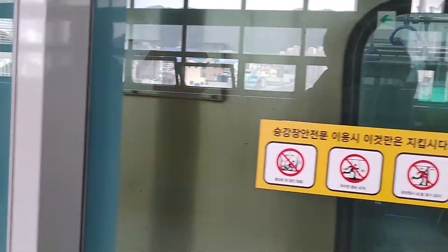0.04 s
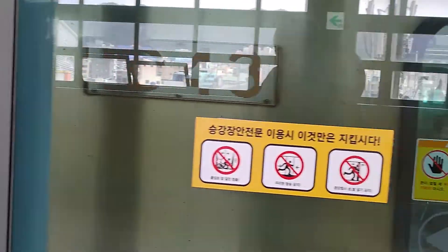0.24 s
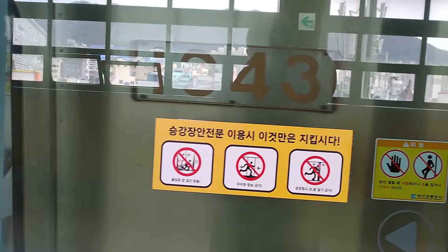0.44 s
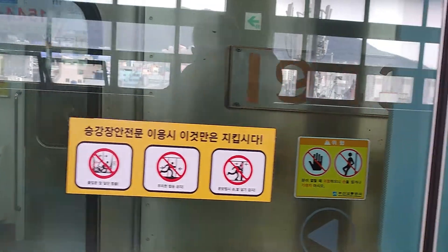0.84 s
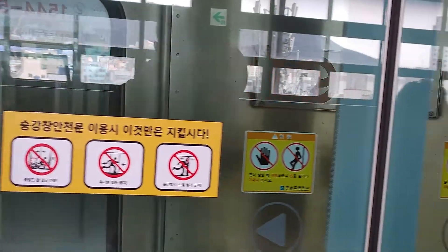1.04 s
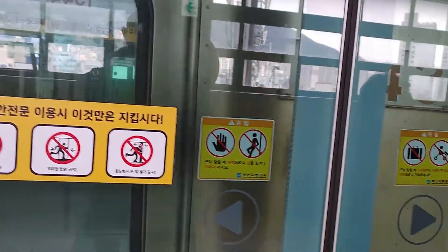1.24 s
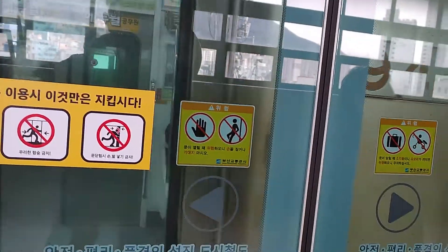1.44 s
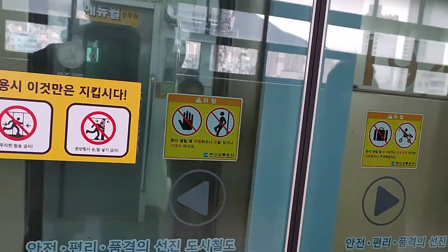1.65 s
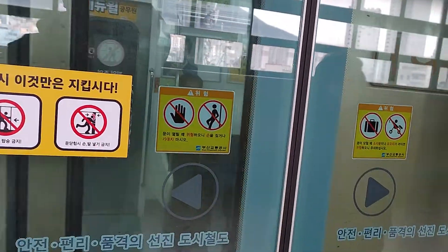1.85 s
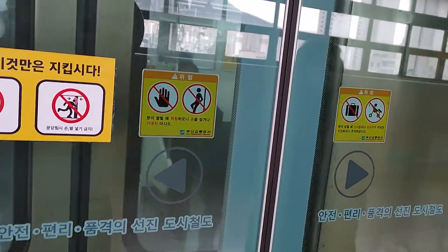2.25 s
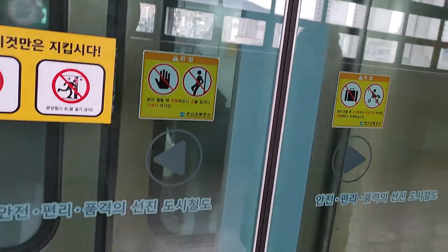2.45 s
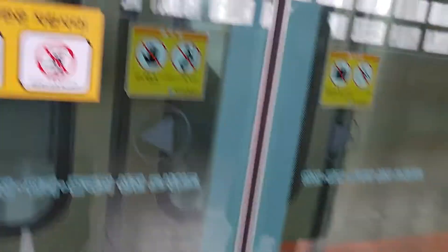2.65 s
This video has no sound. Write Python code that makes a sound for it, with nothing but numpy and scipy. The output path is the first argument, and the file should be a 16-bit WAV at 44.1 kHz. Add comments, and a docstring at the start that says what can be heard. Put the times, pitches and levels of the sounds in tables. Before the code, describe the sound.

A metro train's brakes squeal loudly over a faint rumble as it slows to a stop.

```python
"""A brake squeals near 4.9 kHz as a metro train stops behind the platform screen doors.
Heard from the platform, it swells and fades at each microphone as the car slides by. A weaker brake
joins near 3.5 kHz; others whistle faintly. Below, wheels rumble, pads rasp and the car body hums.
Air puffs and the running gear knocks near the stop. The loudest swell clips."""
import sys
import numpy as np
from scipy import signal
from scipy.fft import rfft, irfft
from scipy.io import wavfile
from scipy.ndimage import uniform_filter1d

SR = 44100
rng = np.random.default_rng(int(sys.argv[2]) if len(sys.argv) > 2 else 0)


def waveform_to_disk(signal):
    """Save audio, clipped to [-1, 1], as 16-bit WAV at the path in sys.argv[1]."""
    frames = np.transpose(np.atleast_2d(signal))
    scaled = np.clip(frames, -1, 1) * 32767
    samples = np.round(scaled).astype(np.int16)
    wavfile.write(sys.argv[1], SR, samples)


N = 119070
TIME_S = np.arange(N) / SR

# Left-right correlation of the noises. Each row: frequency in Hz, correlation.
CORRELATION = [(30, .8), (100, 0.4), (250, 1), (500, 0.5), (1000, -.1), (2200, 0), (4500, -.1),
               (12000, 0.07)]
# Spectra of wheels, pads and brake air. Each row: frequency in Hz, relative density in dB.
RUMBLE_SPECTRUM = [(15, -44), (25, -23.5), (86, -24.5), (216, 2.5), (289, 6), (321, -5.5), (377, 0),
                   (448, -10), (554, -11.5), (600, -10.5), (780, -85.5), (1320, -120)]
ROAR_SPECTRUM = [(300, -8.5), (500, -1), (850, 1.5), (1400, -4), (1800, -14.5), (2300, -26), (4000, -76)]
RASP_SPECTRUM = [(700, -58.5), (1400, -12), (1850, -0.5), (2050, -5), (2350, 2), (3000, -3.5),
                 (3600, -10.5), (4600, -7.5), (5300, -4.5), (6400, -5), (7100, -18.5), (7700, -24.5),
                 (9000, -80.5)]
FIZZ_SPECTRUM = [(6000, -8.5), (7000, 11), (7700, -2.5), (9000, 2), (10500, -2), (11700, 4.5), (12300, -5),
                 (12800, -21), (15800, -26.5)]
AIR_SPECTRUM = [(500, 4.5), (1500, -0.5), (3000, 5), (6000, 7), (8000, 1.5), (11000, 3.5), (13000, -10),
                (15800, -23)]
# Wheel and pad envelopes. Each row: time in seconds, relative level in dB.
RUMBLE_DB = [(0.0, -44.5), (0.1, -48.5), (0.68, -56), (0.75, -37), (0.82, -39.5), (0.83, -41),
             (1.42, -50.5), (1.66, -54.5), (2.19, -51.5), (2.21, -45), (2.7, -47)]
ROAR_DB = [(0.0, -48.5), (0.33, -53.5), (0.36, -59), (0.71, -53), (0.77, -40), (0.86, -48), (1.38, -47),
           (1.53, -53.5), (1.95, -55), (2.09, -60.5), (2.19, -44), (2.57, -50), (2.58, -53.5), (2.7, -55)]
RASP_DB = [(0.0, -43), (0.45, -53), (0.78, -44.5), (0.99, -47), (1.25, -44.5), (1.53, -48.5), (1.57, -47.5),
           (1.61, -50.5), (2.26, -53.5), (2.5, -58), (2.7, -58)]
FIZZ_DB = [(0, -53), (.3, -59.5), (1.08, -56), (1.18, -53), (1.28, -57), (1.37, -47.5), (1.48, -56.5),
           (2.4, -52.5), (2.6, -59.5)]
# Car body notes. Each row: start and end in seconds, pitch in Hz, level in dB.
BODY_HUMS = [(0.701, 0.86, 119.2, -50.5), (0.86, 1.096, 118.4, -48), (1.124, 1.228, 109, -51.5)]
# Brake air. Each row: start and length in seconds, level in dB.
AIR_PUFFS = [(2.452, 0.15, -51), (2.616, 0.17, -51.5)]
# Running gear. Each row: start in seconds, level in dB, centre in Hz, T60 in seconds.
GEAR_KNOCKS = [(2.508, -36.5, 1740, 0.042), (2.535, -51, 60, 0.12)]
# Far brakes. Each row: start and end in seconds, start and end pitch in Hz, relative level in dB.
FAR_WHISTLES = [(-.1, 0.216, 5775, 5640, -43), (0.102, 0.256, 6905, 6860, -44),
                (0.2, 0.625, 6834, 6800, -46), (0.32, .75, 5636, 5555, -45.5), (.42, .65, 4295, 4300, -51),
                (.56, 0.824, 5944, 5960, -37), (0.796, 1.35, 5570, 5570, -47.5),
                (0.829, 1.078, 5870, 5945, -42), (1.261, 1.972, 5700, 5600, -45.5),
                (1.36, 1.56, 6840, 6840, -48.5), (1.521, 1.84, 6000, 6140, -50.5),
                (1.555, 2.029, 6790, 6880, -44), (1.978, 2.248, 6070, 6085, -54),
                (2.022, 2.19, 1884, 1866, -55.5), (2.025, 2.168, 4080, 4065, -48),
                (2.041, 2.308, 6860, 6830, -44), (2.26, 2.551, 6773, 6750, -44),
                (2.297, 2.584, 4670, 4620, -55), (2.436, 2.619, 6110, 6020, -48),
                (2.546, 2.8, 5920, 5910, -42.5)]
# Second and main squeal, fade to fade. Each row: start in seconds, relative fade and swell levels in dB.
SECOND_BRAKE_SWELLS = [(1.15, -89, -75), (1.3, -56.5, -39), (1.485, -46, -42.5), (1.62, -52, -44.5),
                       (1.72, -55.5, -52.5), (1.9, -59.5, -42.5), (1.995, -47, -36.5), (2.082, -46, -32),
                       (2.205, -44, -60), (2.275, -76, -45), (2.335, -74, -52), (2.4, -62, -49),
                       (2.48, -64, -75)]
MAIN_SWELLS_LEFT = [(0.0, -35.0, -26.0), (0.13, -33.0, -17.0), (0.254, -32.0, -7.0), (0.32, -24.0, -10.0),
                    (0.388, -15.0, -10.0), (0.521, -23.0, -14.0), (0.579, -20.0, -14.0),
                    (0.664, -26.0, -11.0), (0.748, -19.0, -12.0), (0.767, -14.0, -11.0),
                    (0.824, -21.0, -10.0), (0.914, -19.0, -11.0), (0.945, -12.0, -14.0),
                    (1.013, -20.0, -22.0), (1.053, -23.0, -9.0), (1.118, -22.0, -19.0), (1.2, -33.0, -12.0),
                    (1.259, -21.0, -15.0), (1.387, -30.0, -20.0), (1.42, -34.0, -13.0), (1.54, -13.0, -9.0),
                    (1.595, -22.0, -14.0), (1.677, -15.0, -28.0), (1.84, -38.0, -9.0),
                    (1.941, -31.0, -12.0), (2.094, -18.0, -9.0), (2.134, -18.0, -12.0),
                    (2.189, -20.0, -17.0), (2.281, -24.0, -15.0), (2.429, -23.0, -29.0),
                    (2.613, -42.0, -39.0)]
MAIN_SWELLS_RIGHT = [(0.0, -19.0, -20.0), (0.107, -32.0, -17.0), (0.224, -19.0, -3.0), (0.291, -20.0, -5.0),
                     (0.33, -10.0, -4.0), (0.374, -12.0, -3.0), (0.42, -12.0, -11.0), (0.483, -16.0, -8.0),
                     (0.581, -18.0, -7.0), (0.622, -33.0, -16.0), (0.658, -14.0, -2.0), (0.737, -9.0, -2.0),
                     (0.957, -9.0, -7.0), (1.026, -9.0, -16.0), (1.105, -18.0, -3.0), (1.143, -13.0, -6.0),
                     (1.284, -11.0, -6.0), (1.339, -19.0, -10.0), (1.37, -20.0, -10.0), (1.478, -6.0, -4.0),
                     (1.534, -5.0, -8.0), (1.64, -14.0, -5.0), (1.697, -12.0, -6.0), (1.936, -9.0, -6.0),
                     (2.002, -10.0, -4.0), (2.051, -16.0, -7.0), (2.238, -25.0, -11.0),
                     (2.351, -17.0, -19.0), (2.496, -28.0, -32.0), (2.611, -36.0, -35.0)]
# Main squeal, settling as the pad bites. Each row: time in seconds, pitch in Hz.
PITCH_HZ = [(0, 4945), (.1, 4925), (.19, 4893), (.4, 4896), (.7, 4889), (2.7, 4891)]
# Right microphone's lead as the brake slides by. Each row: time in seconds, phase in radians.
RIGHT_LEAD_RAD = [(0.184, 2.2), (0.283, -3.9), (0.329, 0.5), (0.417, -1.7), (0.424, 0.4), (0.438, -2.1),
                  (0.466, 1.6), (0.497, 1.2), (0.514, -2.5), (0.608, 2.3), (0.647, -1.9), (0.681, 3.5),
                  (0.741, 1.3), (0.78, 3.7), (0.859, 2.5), (0.883, 5.0), (0.941, 0.3), (0.957, 2.9),
                  (1.02, -2.0), (1.084, 1.1), (1.108, -2.6), (1.131, 1.6), (1.273, -1.9), (1.308, -7.6),
                  (1.378, -3.9), (1.446, -12.1), (1.488, -8.4), (1.554, -11.1), (1.688, 4.5), (1.737, 0.7),
                  (1.896, 2.9), (1.94, 1.1), (2.078, 4.5), (2.127, 2.3), (2.289, 1.6), (2.289, 5.4),
                  (2.365, 7.8), (2.422, 1.7)]
# Partials of the main squeal. Each row: pitch multiple, left and right gain in dB.
HARMONICS = [(2, -37, -34), (3, -62, -61.5)]
HALF_HARMONICS = [(.5, -5, 6), (1.5, -11, -8.5), (2.5, -25, -22)]
# Pad pressure drives the harmonics, uneven slip on alternate cycles the half harmonics.
# Each row: time in seconds, drive in dB.
PRESSURE_DB = [(0, -10), (.15, -8), (.3, 2.5), (1.0, 0.5), (2.0, -1.5), (2.33, -6), (2.5, -16.5),
               (2.7, -39)]
UNEVEN_SLIP_DB = [(0, -51), (.31, -54), (.38, -37), (.5, -52), (.63, -42.5), (.71, -55.5), (.88, -34),
                  (.92, -43), (.97, -34), (1.07, -37), (1.18, -48.5), (1.43, -57), (1.57, -32.5),
                  (1.62, -48), (1.66, -37), (1.77, -49.5), (1.93, -44.5), (2.12, -50.5), (2.22, -80)]

HALL_T60_S, WOBBLE_RATE_HZ = 0.58, 55.7
CLIP_BOTTOM, CLIP_TOP = -.89, .91


def amp(db):
    """dB to gain."""
    return 10 ** (np.asarray(db) / 20)


def unit(x):
    """Scale to rms 1."""
    return x / np.sqrt(np.mean(abs(x) ** 2) + 1e-20)


def curve(rows):
    """Interpolate (seconds, value) rows."""
    return np.interp(TIME_S, *np.transpose(rows))


def over_hz(rows, hz):
    """Interpolate (Hz, value) rows on a log axis."""
    row_hz, value = np.transpose(rows)
    return np.interp(np.log(hz + 1), np.log(row_hz + 1), value)


def drift(rate_hz):
    """Low-passed random motion, rms 1."""
    hz = np.fft.rfftfreq(N, 1 / SR)
    return unit(irfft(rfft(rng.standard_normal(N)) * np.exp(-(hz / rate_hz) ** 2) * (hz > 0), N))


def phasor(hz):
    """Complex tone along a pitch curve."""
    return np.exp(2j * np.pi * np.cumsum(hz) / SR)


def gate(start_s, end_s, fade_s):
    """Soft rise, hold, soft fall."""
    return np.sin(np.pi / 2 * np.clip(np.minimum(TIME_S - start_s, end_s - TIME_S) / fade_s, 0, 1)) ** 2


def hall(x):
    """Many paths between train and platform doors, separate per microphone."""
    delay_s = TIME_S[:SR // 2]
    taps = rng.standard_normal((2, len(delay_s))) * np.exp(-np.log(1000) * delay_s / HALL_T60_S)
    taps /= np.linalg.norm(taps, axis=1, keepdims=True)
    return signal.fftconvolve(x[None], taps, axes=1)[:, :N]


def scattered(tone, wet=1.0, window_s=0.27):
    """A tone beats with its hall paths; running rms held near 1."""
    mix = np.sqrt(1 - wet) * tone * np.array([[1], [1j]]) + np.sqrt(wet) * hall(tone)
    return mix / np.sqrt(uniform_filter1d(abs(mix) ** 2, int(window_s * SR), axis=1) + 1e-4)


def swells(rows):
    """Two paths beat: rounded swells between sharp fades."""
    start_s, fade_db, swell_db = np.transpose(rows)
    position = np.interp(TIME_S, np.append(start_s, N / SR), np.arange(len(start_s) + 1))
    arches = amp(swell_db)[position.astype(int)] * np.sin(np.pi * position)
    return np.hypot(np.interp(TIME_S, start_s, amp(fade_db)), arches)


def noise(spectrum, patchy_db, right_db):
    """Coloured stereo noise with drifting patches."""
    frames, hz = N // 256 + 5, np.fft.rfftfreq(1024, 1 / SR)
    draws = rng.standard_normal((5, frames, len(hz))).transpose(0, 2, 1)
    left, independent = draws[0] + 1j * draws[1], draws[2] + 1j * draws[3]
    patches = unit(uniform_filter1d(uniform_filter1d(draws[4], size=12, axis=0), size=9, axis=1))
    shared = over_hz(CORRELATION, hz)[:, None]
    bins = np.array([left, shared * left + np.sqrt(1 - shared ** 2) * independent])
    bins *= amp(over_hz(spectrum, hz)[:, None] + patchy_db * patches)
    stereo = signal.istft(bins, nperseg=1024, noverlap=768)[1][:, :N]
    return unit(stereo) * amp([[-right_db / 2], [right_db / 2]])


def rolling():
    """Wheels rumble and roar on the rail; pads rasp and fizz."""
    return (noise(RUMBLE_SPECTRUM, patchy_db=1.5, right_db=0.5) * amp(curve(RUMBLE_DB) + 0.17)
            + noise(ROAR_SPECTRUM, patchy_db=1.5, right_db=0.5) * amp(curve(ROAR_DB) + 2)
            + noise(RASP_SPECTRUM, patchy_db=2.5, right_db=6.5) * amp(curve(RASP_DB) + 5)
            + noise(FIZZ_SPECTRUM, patchy_db=4, right_db=8) * amp(curve(FIZZ_DB) + 1))


def body_hums():
    """The car body booms on a few low notes."""
    out = np.zeros(N)
    for start_s, end_s, hz, db in BODY_HUMS:
        tone = phasor(hz * (1 + 0.017 * drift(rate_hz=20))).real
        out += np.sqrt(2) * amp(db) * gate(start_s, end_s, fade_s=0.042) * tone
    return out


def air_puffs():
    """Brake valves vent briefly, to the right."""
    envelope = sum(amp(db) * gate(start_s, start_s + length_s, fade_s=0.058)
                   for start_s, length_s, db in AIR_PUFFS)
    return noise(AIR_SPECTRUM, patchy_db=-1.5, right_db=27) * envelope


def gear_knocks(attack_s=0.0017):
    """The running gear knocks dully as the car comes to rest."""
    out = np.zeros((2, N))
    for start_s, db, hz, t60_s in GEAR_KNOCKS:
        age_s = np.maximum(TIME_S - start_s, 0)
        body = noise([(hz / 8, -25), (hz, 0), (hz * 2, -6), (hz * 8, -50)], patchy_db=11, right_db=22.5)
        out += body * amp(db) * np.minimum(age_s / attack_s, 1) * np.exp(-np.log(1000) * age_s / t60_s)
    return out


def far_whistles(fade_s=0.164, wobble=0.0032):
    """Farther brakes catch briefly, each on its own gliding note."""
    out = np.zeros((2, N))
    for start_s, end_s, from_hz, to_hz, db in FAR_WHISTLES:
        hz = curve([(start_s, from_hz), (end_s, to_hz)]) * (1 + wobble * drift(WOBBLE_RATE_HZ))
        envelope = amp(db) * gate(start_s - fade_s / 4, end_s + fade_s / 2, fade_s)
        out += envelope * scattered(phasor(hz), wet=0.99).real
    return np.sqrt(2) * out * amp([[0.5], [7.5]])


def second_squeal(pitch_hz=3498, wobble_hz=4):
    """The next brake joins halfway: weaker, lower, purer, in separate swells."""
    tone = scattered(phasor(pitch_hz + wobble_hz * drift(WOBBLE_RATE_HZ)), wet=.1).real
    return np.sqrt(2) * swells(SECOND_BRAKE_SWELLS) * amp([[-2], [4]]) * tone


def main_squeal(tremble_hz=4, rough_hz=17, slip_wobble_hz=7, bite_s=0.21, surge_db=1.7):
    """A brake disc sings and surges once; its paths add and cancel per microphone, over a rough echo."""
    pitch_hz, wobble = curve(PITCH_HZ), drift(WOBBLE_RATE_HZ)
    rough_pitch_hz = pitch_hz + rough_hz * wobble
    slip_pitch_hz = pitch_hz + slip_wobble_hz * wobble
    surge = amp(surge_db * gate(.828, .888, fade_s=.03))
    envelope = np.array([swells(MAIN_SWELLS_LEFT), swells(MAIN_SWELLS_RIGHT)]) * surge
    lead_rad = uniform_filter1d(curve(RIGHT_LEAD_RAD), size=290)
    # The fainter side takes most of the phase turn.
    right_rad = np.cumsum(np.gradient(lead_rad) * envelope[0] ** 2 / (envelope ** 2).sum(0))
    paths = np.exp(1j * np.array([right_rad - lead_rad, right_rad]))
    direct = phasor(pitch_hz + tremble_hz * wobble) * paths
    # Flutter: strongest until the pad bites, weaker in loud swells.
    flutter = (.5 + .76 * gate(-1, bite_s, fade_s=0.055)) * np.clip(1 - envelope / CLIP_TOP, 0, 1)
    echo = flutter * scattered(phasor(rough_pitch_hz))
    out = envelope * (direct + echo)
    for partials, drive_db, base_hz, wet in [(HARMONICS, PRESSURE_DB, rough_pitch_hz, 1),
                                             (HALF_HARMONICS, UNEVEN_SLIP_DB, slip_pitch_hz, .2)]:
        for multiple, left_db, right_db in partials:
            gain = np.sqrt(2) * amp(curve(drive_db)) * amp([[left_db], [right_db]])
            out += gain * scattered(phasor(multiple * base_hz), wet)
    return out.real


def scene():
    """Stereo sum on the platform."""
    brakes = main_squeal() + second_squeal() + far_whistles()
    return brakes + rolling() + body_hums() + air_puffs() + gear_knocks()


def record(dry, low_cut_hz=48, band_limit_hz=15900):
    """Microphone bass cut; uneven converter clipping at 48 kHz folds overtones down; band limit."""
    thin = signal.sosfilt(signal.butter(2, low_cut_hz, "high", fs=SR, output="sos"), dry)
    upsampled = signal.resample_poly(thin, 160, 147, axis=1, window=("kaiser", 10))
    clipped = np.clip(upsampled, CLIP_BOTTOM, CLIP_TOP)
    downsampled = signal.resample_poly(clipped, 147, 160, axis=1, window=("kaiser", 10))[:, :N]
    lowpass = signal.firwin(511, band_limit_hz, window=("kaiser", 9), fs=SR)
    return signal.oaconvolve(downsampled, lowpass[None], "same")


dry = scene()
out = record(dry)
waveform_to_disk(out)
```